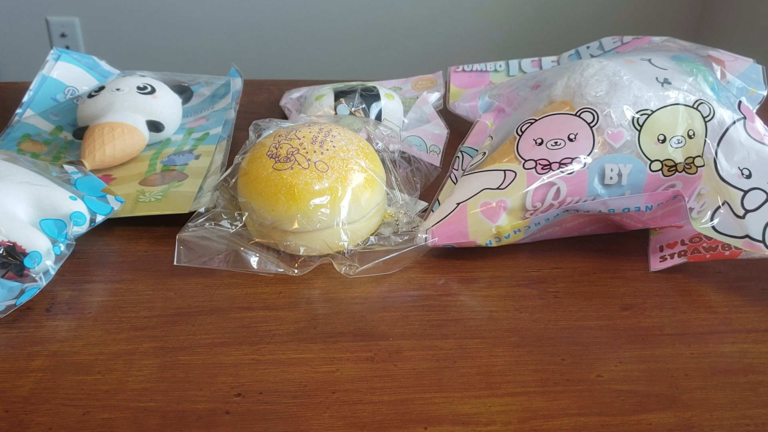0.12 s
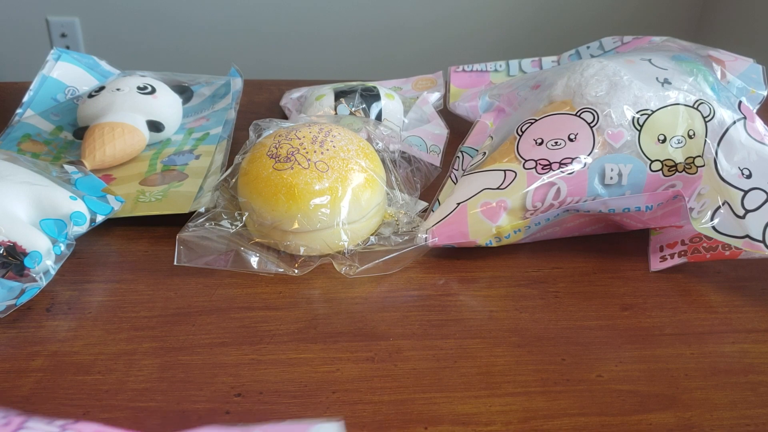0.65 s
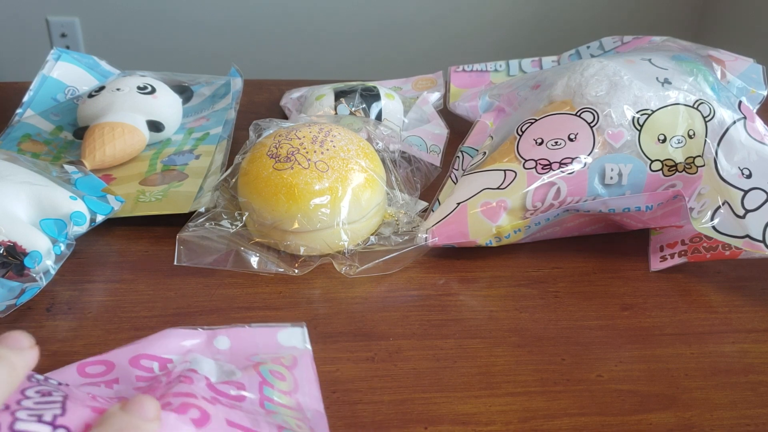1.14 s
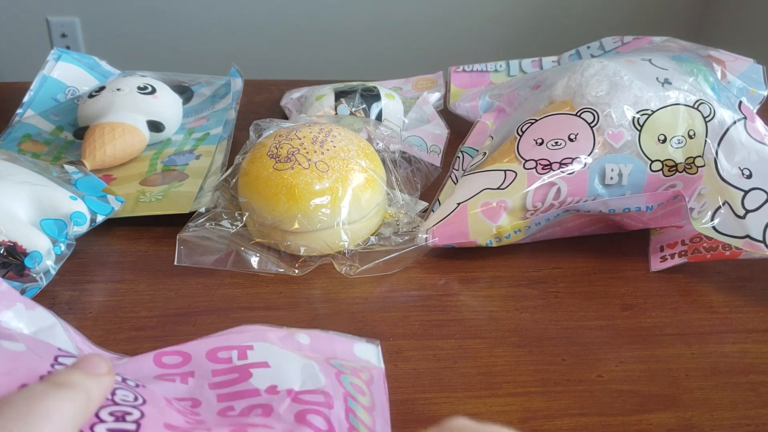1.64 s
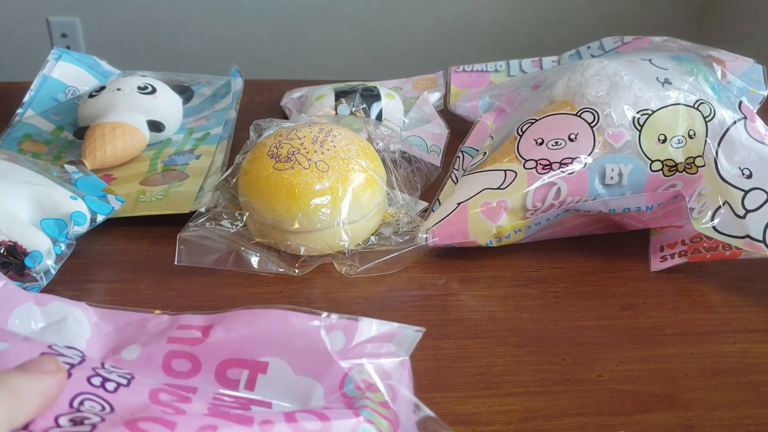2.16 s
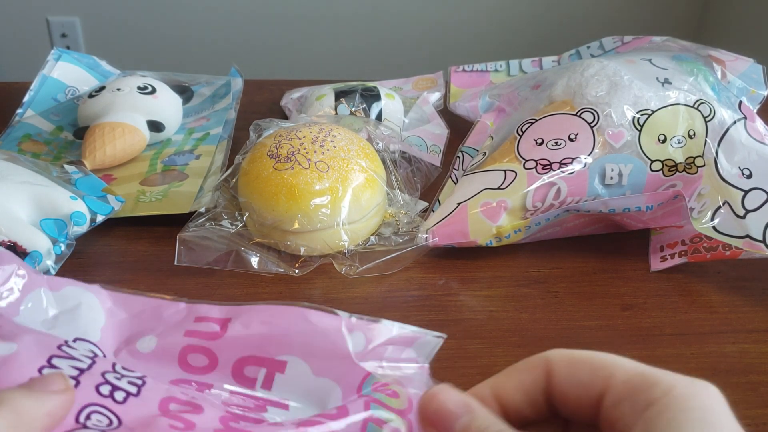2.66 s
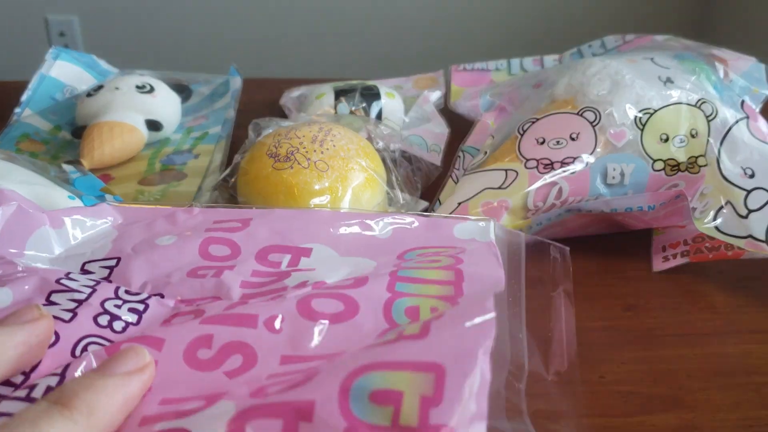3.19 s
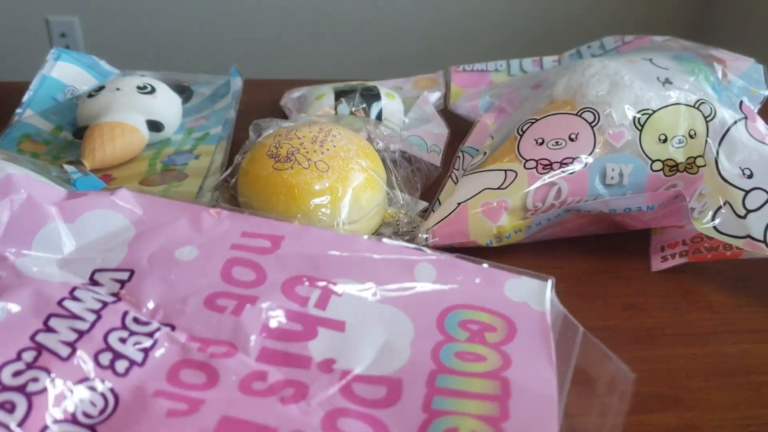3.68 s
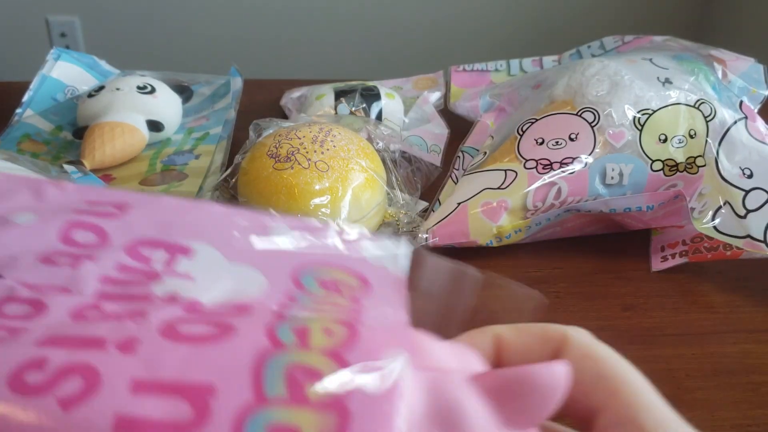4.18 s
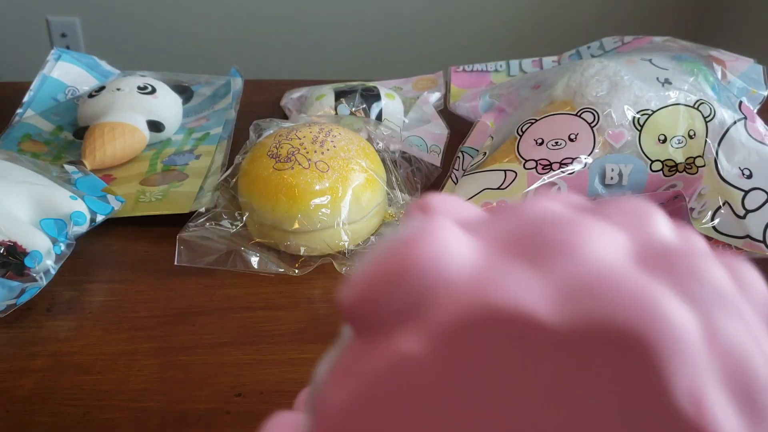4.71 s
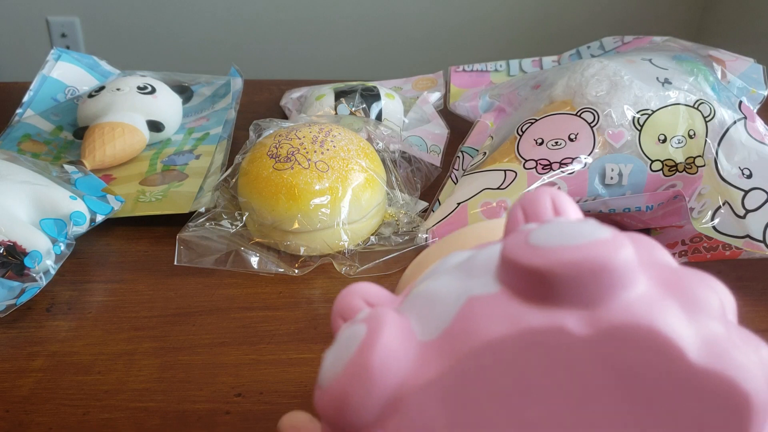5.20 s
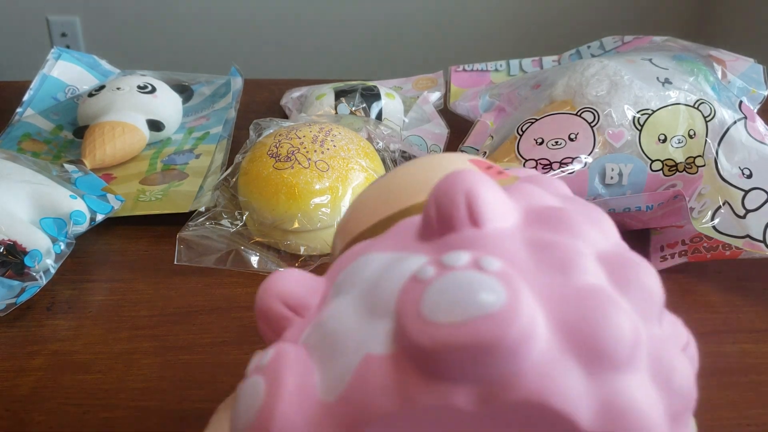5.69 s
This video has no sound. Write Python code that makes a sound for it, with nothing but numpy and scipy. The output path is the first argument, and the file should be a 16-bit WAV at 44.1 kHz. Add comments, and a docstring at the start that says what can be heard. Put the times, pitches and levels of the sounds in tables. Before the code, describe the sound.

Hands handle a stiff plastic packaging bag at a wooden table in a small quiet room. Bright sharp snaps burst in irregular clusters over finer crackle, with small hollow pops of the film. Later the rustle grows softer and fuller as the bag flexes and is emptied, then it thins out to faint room air. Close stereo phone, bag mostly to the left, short room reflections.

```python
"""At a wooden table in a small quiet room, close to a stereo phone and mostly left of it,
two hands turn, pull and open a stiff plastic bag.
Creases snap in short bright bursts of filtered noise, a swarm of smaller ones fills the gaps,
panels pop as brief damped tones and the bag body flexes as low noise.
Table and walls return smeared echoes and a short tail over a steady floor of room air."""
import sys
import numpy as np
from scipy import signal
from scipy.fft import rfft, irfft, next_fast_len
from scipy.io import wavfile
from scipy.ndimage import uniform_filter1d

SR = 44100
rng = np.random.default_rng(int(sys.argv[2]) if len(sys.argv) > 2 else 0)


def boost(x):
    """Linear amplitude factor 10**(x/20) for a level x in decibels (scalar or array-like)."""
    u = np.asarray(x, float) / 20
    return 10 ** u


def unload_audio(sound):
    """Save the sound as a 16-bit wav file, at the path given as the first command line argument."""
    columns = np.transpose(np.atleast_2d(sound))
    # keep every value between -1 and 1, then stretch to whole-number steps
    steps = np.round(np.clip(columns, -1, 1) * 32767)
    wavfile.write(sys.argv[1], SR, steps.astype(np.int16))


N = 257391  # length [samples]
BURST = 1024  # length of one crease [samples]

# Levels in the tables hold ahead of the phone's rounding of peaks.
# Loud crease snaps: (time [s], level [dB], ring [Hz], treble re level, before a common lift [dB])
LOUD_SNAPS = [(0.0273, -31, 4200, -31), (0.0538, -22.5, 5890, -12), (0.0875, -25.5, 7250, -12),
              (0.1266, -29, 4330, -4.5), (0.1422, -21.5, 2200, -23), (0.1718, -24.5, 2680, -16),
              (0.2227, -35, 1670, -20), (0.2395, -27, 3680, -22), (0.2564, -27, 1820, -28),
              (0.3223, -23, 4700, -8), (0.336, -19.5, 4600, -23.5), (0.3681, -29, 4530, -24),
              (0.4152, -32.5, 3130, -18), (0.4525, -13.5, 6550, -8), (0.4558, -25, 4200, -8),
              (0.4943, -19.5, 6400, -3.5), (0.5004, -26.5, 3460, -1.5), (0.5078, -18.5, 4820, -2.5),
              (0.5157, -12.5, 5070, -6.5), (0.5213, -14.5, 5900, -8.5), (0.529, -12, 5710, -11),
              (0.5356, -9.5, 6300, -9), (0.5543, -15, 4910, -1.5), (0.594, -24.5, 6480, -15),
              (0.627, -30.5, 5500, -4), (0.635, -18.5, 3300, -12), (0.6719, -37, 4370, -10),
              (0.684, -30, 7420, -6.5), (0.7111, -32, 3750, -11), (0.7286, -28.5, 7420, -10),
              (0.7864, -20, 1800, -8.5), (0.8263, -29.5, 5420, -13), (0.834, -21, 6200, -12),
              (0.8766, -26, 5060, -16), (0.8995, -29.5, 6600, -11), (0.9052, -28.5, 1500, -18),
              (0.9332, -29.5, 5070, -21), (0.949, -28, 6100, -11), (1.002, -33.5, 4370, -28),
              (1.023, -28, 6640, -14), (1.037, -21, 6740, -7.5), (1.0874, -36.5, 4900, -12),
              (1.1457, -26.5, 4350, -12), (1.1528, -22.5, 4240, -4.5), (1.1628, -31, 4730, -32),
              (1.2097, -24, 6170, -16), (1.2224, -19, 4200, -2), (1.2302, -18.5, 6430, -11),
              (1.2454, -19, 6500, -7), (1.26, -22, 3970, -1), (1.2744, -8, 6600, -11),
              (1.281, -14.5, 5850, -4), (1.2884, -25, 2090, -17.5), (1.2972, -11, 6000, -20.5),
              (1.3042, -15, 6230, -6), (1.3114, -15, 4850, -7), (1.4014, -23.5, 2680, -7),
              (1.4154, -27.5, 2640, -16), (1.4494, -25.5, 6760, -15), (1.4664, -24, 1940, -8.5),
              (1.4854, -22, 6960, -8.5), (1.517, -25.5, 2640, -19), (1.5744, -28.5, 2870, -19),
              (1.6008, -29.5, 2700, -14.5), (1.61, -24.5, 4550, -14.5), (1.6432, -23.5, 4800, -9.5),
              (1.6801, -33, 6600, -14.5), (1.6854, -27.5, 4100, -14), (1.732, -26.5, 6500, -6),
              (1.7362, -28.5, 2750, -7.5), (1.7806, -33, 1530, -11), (1.8017, -21, 6460, -9),
              (1.8136, -34, 5950, -4), (1.8976, -20, 6050, -8.5), (1.9016, -21, 4100, -3.5),
              (1.9677, -21, 5850, 1), (1.9956, -21, 7090, 6), (1.9946, -20.5, 3740, -5.5),
              (2.0003, -21, 1500, -1), (2.0044, -14, 4800, 1), (2.0082, -11, 6600, -4),
              (2.0182, -16, 5900, -5), (2.0234, -19.5, 5330, -19), (2.0393, -15.5, 5370, -12.5),
              (2.0654, -10, 1800, -10), (2.0722, -17, 4020, -9), (2.0764, -17, 6170, -2),
              (2.0827, -17, 3650, -17), (2.1124, -24.5, 2040, -5.5), (2.133, -25, 4130, -16),
              (2.1582, -28, 6620, -6), (2.2054, -26.5, 7050, -6), (2.246, -22, 2450, -24.5),
              (2.2631, -21.5, 2700, -25), (2.2742, -27, 4350, -30), (2.3847, -32, 4840, -27),
              (2.396, -34.5, 1630, -30), (2.4318, -21, 7150, -11), (2.4621, -21, 3380, -5.5),
              (2.497, -25, 1700, -26), (2.6383, -26, 6850, -20), (2.6796, -27.5, 5060, -25.5),
              (2.711, -19, 5870, -4.5), (2.7132, -11.5, 7300, -3.5), (2.7236, -18, 3200, -19),
              (2.7718, -16.5, 4200, -9.5), (2.7997, -17, 5860, -12), (2.8062, -19, 3960, -6.5),
              (2.8185, -13.5, 5540, -5), (2.8314, -17, 4900, -13), (2.8416, -22.5, 3460, -9.5),
              (2.8464, -21, 6160, -6), (2.889, -31.5, 4240, -8), (2.9547, -18.5, 1620, -21),
              (2.9616, -25.5, 6340, -16), (2.9714, -23.5, 5260, -7), (3.0025, -26.5, 4740, -12),
              (3.056, -33.5, 7540, -0.5), (3.0919, -26, 2900, -34), (3.1185, -30.5, 3490, -8),
              (3.13, -25, 3560, -20), (3.1394, -21, 3760, -20), (3.1866, -22, 4250, -9.5),
              (3.2063, -20.5, 3230, -17.5), (3.2656, -27.5, 4280, -24), (3.2944, -23, 3480, -21),
              (3.3087, -25.5, 4800, -6), (3.3393, -30, 4110, -9), (3.3897, -38, 3450, -19),
              (3.459, -24.5, 6260, -17), (3.493, -15, 6400, -10.5), (3.518, -18.5, 2140, -13),
              (3.5371, -19.5, 1970, -7), (3.5592, -19, 4510, -19.5), (3.5738, -14.5, 3900, -13.5),
              (3.5806, -18, 4800, -17), (3.6136, -30.5, 7160, -22), (3.695, -15.5, 3970, -20.5),
              (3.8011, -32.5, 4570, -21), (3.8656, -31.5, 3000, -25), (3.891, -30, 2090, -20),
              (3.9057, -19.5, 4360, -9.5), (3.9366, -25.5, 2800, -22), (3.9509, -27.5, 3490, -26),
              (3.9943, -30.5, 2680, -26), (4.0127, -24, 6460, -18), (4.017, -19.5, 4050, -18),
              (4.0377, -21.5, 4110, -13), (4.0525, -11, 6650, -15.5), (4.0572, -18, 3020, -17),
              (4.0649, -16.5, 4230, -20.5), (4.1088, -13, 5850, -16), (4.1294, -12.5, 4650, -12),
              (4.1407, -15.5, 3500, -17.5), (4.1475, -22, 3490, -21), (4.1737, -28, 1920, -22),
              (4.2074, -28, 1800, -19), (4.2187, -18.5, 6370, -27), (4.2347, -26, 3140, -4.5),
              (4.2654, -22, 3340, -19), (4.2938, -16, 4800, -15), (4.338, -23.5, 4130, -15),
              (4.3445, -21.5, 4240, -19), (4.3636, -21, 4930, -18), (4.3975, -29, 3470, -5),
              (4.4106, -18.5, 4400, -11.5), (4.4244, -25.5, 2820, -15), (4.4603, -32.5, 7100, -24),
              (4.4648, -22, 2970, -30), (4.4957, -29, 2770, -17), (4.5134, -30, 7180, -3),
              (4.602, -32.5, 3250, -30), (4.6478, -27, 4350, -8.5), (4.6635, -28.5, 2400, -20),
              (4.688, -34, 2300, -26), (4.825, -30, 4700, -16), (4.8349, -24.5, 6900, -10.5),
              (4.8648, -35, 4060, -22), (4.9266, -24.5, 3900, -21), (4.9306, -25, 6200, -7.5),
              (5.0569, -25, 7500, -19), (5.0863, -32, 3480, -15), (5.1943, -41, 3760, -20),
              (5.5717, -44.5, 3740, -28)]
# Lag of the left ear behind the right, negative when it leads: (time [s], lag [samples])
LEFT_EAR_LAG = [(0, -4.5), (1.5, -7), (3.0, -2.5), (3.7, -12), (4.7, -19.5), (5.8, -18.5)]
# Tone of the creases at the microphones: (frequency [Hz], relative level [dB])
MIC_RESPONSE = [(40, -38.5), (140, 15), (420, -7.5), (1000, 2), (3000, -1.5), (6500, -2.5), (7300, -1),
                (8800, -14.5), (11900, -15), (15800, -17.5), (16800, -60.5)]
# Colour of the flexing bag body: (frequency [Hz], relative density [dB per Hz])
FLEX_COLOUR = [(30, -16), (60, -1), (135, 2), (330, -2.5), (730, -1), (1500, -22.5)]
# Colour of the room air: (frequency [Hz], relative density [dB per Hz])
FLOOR_COLOUR = [(24, -35.5), (40, -10.5), (113, -4.5), (190, -9), (500, -21.5), (1500, -25), (2000, -12),
                (2700, -10.5), (7000, -18), (8800, -27), (15400, -23.5), (17000, -45.5)]
# Echoes from table and walls: (delay [s], level re the bag [dB])
SURFACE_ECHOES = [(.0025, -8.5), (.009, -16), (0.015, -19.5)]
# Decay of the small room: (frequency [Hz], time to fall 60 dB [s])
ROOM_DECAY = [(200, 0.13), (1400, 0.12), (4000, 0.18), (12000, 0.12)]
# Hollow pops and thuds of whole panels: (time of peak [s], peak rms before panning [dB], pitch [Hz])
PANEL_POPS = [(0.056, -36.5, 850), (0.324, -30, 1080), (0.456, -36, 1040), (0.497, -44.5, 148),
              (0.524, -32.5, 1090), (0.537, -45, 155), (0.537, -41, 790), (1.262, -55, 117),
              (1.299, -48, 880), (1.899, -38.5, 930), (1.999, -31, 1330), (2.042, -41.5, 804),
              (2.067, -35.5, 1067), (2.072, -41, 302), (2.077, -29, 950), (2.247, -39, 1160),
              (2.774, -27.5, 710), (2.802, -37, 600), (2.821, -47.5, 980), (2.824, -52, 131),
              (2.955, -49, 1300), (3.142, -41.5, 690), (3.699, -37, 875), (4.015, -42.5, 236),
              (4.15, -34, 784), (4.267, -39, 720), (4.829, -49.5, 130), (4.934, -41.5, 170),
              (1.525, -55, 101), (1.996, -52, 130), (2.022, -52, 110), (4.14, -49, 120), (4.248, -47, 170),
              (4.561, -45, 373)]
# Grips and pulls: (start [s], end [s], base level of small crackle [dB], level of flexing [dB])
HAND_GRIPS = [(0, 0.026, -41.5, -70), (0.123, .41, -47.5, -69.5), (0.498, 0.57, -35.5, -50),
              (0.72, 1.12, -51, -68), (1.193, 1.238, -43, -71.5), (1.248, 1.301, -25.5, -62),
              (1.4, 1.747, -45, -68.5), (1.908, 1.881, -36, -53), (2.02, 2.063, -27, -58),
              (2.197, 2.304, -53, -71.5), (2.424, 2.467, -54.5, -73.5), (2.686, 2.773, -40, -60.5),
              (2.782, 2.809, -27.5, -49), (2.936, 3.002, -41, -56.5), (3.203, 3.217, -41, -52.5),
              (3.322, 3.592, -41, -52), (3.69, 3.735, -46, -53), (3.886, 3.99, -42, -52),
              (4.064, 4.256, -38, -49.5), (4.318, 4.432, -43, -46.5), (4.424, 4.566, -48.5, -50.5),
              (4.63, 4.738, -51.5, -61.5), (4.82, 4.847, -41.5, -52.5), (4.93, 4.953, -47.5, -49),
              (4.996, 5.105, -49, -59.5), (5.152, 5.312, -62.5, -83), (5.685, 5.733, -69.5, -72.5)]
# Place and facing of the bag: (time [s], left minus right [dB], small-crease treble before lift [dB])
BAG_PLACE = [(0, 4.5, -13.5), (.5, 7.5, -25), (1.3, 5, -12.5), (2.0, 4, -15.5), (2.6, 4.5, -27),
             (3.4, 5, -18.5), (3.8, 4, -17.5), (4.4, 10.5, -23), (5.2, 9.5, -20), (5.84, -1, -5)]

FLOOR_DB, ROOM_TAIL_DB = -68, -7.5  # middle of the two ears; tail energy re the bag
RISE_DB_PER_S, FALL_DB_PER_S = 402, 186.5  # slopes before and after a grip
SNAP_BODY_DB, BODY_SCATTER_DB, PAN_SCATTER_DB = -15.5, 3.5, 3  # body before a common trim
LEFT_RIGHT = np.array([[1], [-1]])


def shape(points, hz):
    """Value of a (frequency [Hz], value) table on a log-frequency axis."""
    f, v = np.transpose(points)
    return np.interp(np.log(np.maximum(hz, 1)), np.log(f), v)


def colour(x, points):
    """Filter by a (frequency [Hz], level [dB]) table."""
    n = next_fast_len(x.shape[-1])
    gain = boost(shape(points, np.fft.rfftfreq(n, 1 / SR)))
    return irfft(rfft(x, n) * gain, n)[..., :x.shape[-1]]


def unit(x):
    """Scale to rms 1."""
    return x / np.sqrt(np.mean(x ** 2))


def walk(rate):
    """Random levels held 1 / rate s and slewed; spread near 1."""
    hold = int(SR / rate)
    steps = np.repeat(rng.standard_normal(N // hold + 1), hold)
    return unit(uniform_filter1d(steps, hold)[:N])


def resonance(hz, centre_hz, q):
    """Response of a damped patch of film."""
    damping = 1j * hz * centre_hz / q
    return damping / (centre_hz ** 2 - hz ** 2 + damping)


def floor():
    """Quiet room air as steady coloured noise; its bass is more alike in both ears."""
    mid, side = colour(rng.standard_normal((2, N)), FLOOR_COLOUR)
    side = colour(side, [(200, -7.5), (1400, 0.5)])
    ears = (mid + side * LEFT_RIGHT) / np.std(mid)
    return boost(FLOOR_DB + 2.0 * LEFT_RIGHT) * ears


def grips():
    """Crackle and flexing levels build up fast to each grip and die away more slowly after it."""
    t = np.arange(N) / SR
    power = 0
    for start, end, *db in HAND_GRIPS:
        # where the end precedes the start the two slopes overlap
        fade_db = RISE_DB_PER_S * np.maximum(start - t, 0) + FALL_DB_PER_S * np.maximum(t - end, 0)
        power = power + boost(np.array(db)[:, None] - fade_db) ** 2
    return 10 * np.log10(power)


def snaps(s, level_db, ring_hz, body_db, treble_db, pan_db, rise_ms, q, alike):
    """Each crease buckles in a run of tiny slips about a millisecond long that rings the film around it."""
    t = np.arange(BURST) / SR
    hz = np.fft.rfftfreq(BURST, 1 / SR)
    draw = rng.standard_normal((len(s), 2 * BURST + 2))
    left_slips, right_slips = draw[:, :BURST], draw[:, BURST:2 * BURST]
    rise = rise_ms / 1000 * np.exp(0.14 * draw[:, -1:])
    swell = t / rise * np.exp(-t / rise)
    # the air in the bag hums near one pitch, the slack film varies from crease to crease
    film_hz = 800 * np.exp(0.45 * draw[:, -2:-1])
    body = resonance(hz, 730, 2.0) + 1.36 * resonance(hz, film_hz, 1.66) ** 2
    ring = resonance(hz, ring_hz[:, None], q) + 0.77 * resonance(hz, 6800, 0.39)
    treble = resonance(hz, 12550, 1.57) ** 2
    # the far ear sees the patch from another side: treble detail differs and arrives apart
    share = np.clip(alike, 0, 1) ** (hz ** 2 / (hz ** 2 + 900 ** 2))
    lag = np.interp(s, *np.transpose(LEFT_EAR_LAG))[:, None]
    shift = np.exp(2j * np.pi * hz * lag / SR)
    mic = boost(shape(MIC_RESPONSE, hz))

    def levelled(spectrum, db):
        """Set the energy as if it were spread over half a millisecond."""
        energy = np.sum(irfft(spectrum) ** 2, 1, keepdims=True)
        return boost(db)[:, None] * spectrum * np.sqrt(.0005 * SR / energy)

    # (response, level [dB], sharpness): treble comes only from the fastest part of the run
    parts = ((ring, 0 * s, 1.3), (body, body_db - .7, .7), (treble, treble_db + 4.5, 2.6))
    left = right = 0
    for response, part_db, sharpness in parts:
        near = rfft(left_slips * swell ** sharpness) * response * mic
        other = rfft(right_slips * swell ** sharpness) * response * mic
        far = (share * near + np.sqrt(1 - share ** 2) * other) * shift
        left = left + levelled(near, part_db)
        right = right + levelled(far, part_db)
    out = np.zeros((2, N + BURST))
    at = (s * SR).astype(int)[:, None] + np.arange(BURST)
    for side, sign, burst in zip(out, (1, -1), (left, right)):
        np.add.at(side, at, boost(level_db + sign * pan_db / 2)[:, None] * irfft(burst))
    return out[:, :N]


def crackle(level_db, treble_db, pan_db, count, spread_db):
    """Small creases let go at random moments: many faint, a few strong."""
    draw = rng.random((count, 6))
    # a wavy warp of time bunches the moments into clusters
    last = (N - 1) / SR
    s = draw[:, 0] * last
    s = np.clip(s + .004 * walk(60)[(s * SR).astype(int)], 0, last)
    at = (s * SR).astype(int)
    size_db = -2.5 - spread_db * np.log(1 - .97 * draw[:, 1])
    ring_hz = 1800 * 2.77 ** draw[:, 2]
    body_db = -20 + 14 * draw[:, 3]
    crease_treble_db = treble_db[at] + 10 * (draw[:, 4] - .5)
    crease_pan_db = pan_db[at] + 8 * (draw[:, 5] - .5)
    return snaps(s, level_db[at] + size_db, ring_hz, body_db, crease_treble_db, crease_pan_db,
                 rise_ms=0.912, q=0.65, alike=0.2)


def flexing(level_db, pan_db):
    """The air-filled bag body puffs and thuds softly when squeezed; long waves reach both ears more evenly."""
    puffs = boost(3.8 * walk(40))
    shared, apart = (unit(colour(rng.standard_normal(N) * puffs, FLEX_COLOUR)) for _ in range(2))
    return boost(level_db + 0.19 * pan_db * LEFT_RIGHT) * (shared + .5 * apart * LEFT_RIGHT)


def room(x):
    """Smeared echoes from table and walls, and a diffuse tail whose octaves each decay at their own rate."""
    t = np.arange(int(.5 * SR)) / SR
    tail = 0
    for hz in 125 * 2. ** np.arange(8):
        octave = [(hz / 2, -40), (hz / 1.4, 0), (hz * 1.4, 0), (hz * 2, -40)]
        band = colour(rng.standard_normal((2, len(t))), octave)
        band = band + 900 / hz * band.mean(0)  # the bass is more alike in both ears
        decay = np.exp(-np.log(1000) * t / shape(ROOM_DECAY, hz))
        tail = tail + unit(band) / np.sqrt(np.mean(hz ** -1.)) * decay
    tail = tail * np.clip((t - .004) / 0.0046, 0, 1)
    answer = boost(ROOM_TAIL_DB) * tail / np.sqrt(np.sum(tail ** 2, 1, keepdims=True))
    for s, db in SURFACE_ECHOES:
        smear = rng.standard_normal((2, len(t))) * np.exp(-np.abs(t - s) / 0.00048)
        answer = answer + boost(db) * smear / np.sqrt(np.sum(smear ** 2, 1, keepdims=True))
    return signal.fftconvolve(x.mean(0, keepdims=True), answer, axes=1)[:, :N]


def loud_creases(pan_db):
    """The strong snaps, each from its own spot on the bag."""
    s, level_db, ring_hz, treble_db = np.transpose(LOUD_SNAPS)
    draw = rng.standard_normal((len(s), 2))
    body_db = SNAP_BODY_DB + BODY_SCATTER_DB * draw[:, 0]
    snap_pan_db = pan_db[(s * SR).astype(int)] + PAN_SCATTER_DB * draw[:, 1]
    return snaps(s, level_db, ring_hz, body_db, treble_db, snap_pan_db,
                 rise_ms=0.876, q=3.9, alike=0.097)


def pops(pan_db, cycles):
    """A panel of the bag flips and swings for a few cycles, pushing the air inside."""
    t = np.arange(4 * BURST) / SR
    out = np.zeros((2, N + len(t)))
    for (s, db, hz), turn in zip(PANEL_POPS, rng.random(len(PANEL_POPS))):
        rise = cycles / hz
        envelope = np.sqrt(2) * t / rise * np.exp(1 - t / rise)
        swing = envelope * np.sin(2 * np.pi * (hz * t + turn))
        at = int((s - rise) * SR)
        out[:, at:at + len(t)] += boost(db + 0.35 * pan_db[at] * LEFT_RIGHT) * swing
    return out[:, :N]


def scene():
    """Bag, room and floor as the two microphones hear them."""
    s, *columns = np.transpose(BAG_PLACE)
    pan_db, treble_db = (np.interp(np.arange(N) / SR, s, c) for c in columns)
    quiet_air = floor()
    crackle_db, flex_db = grips()
    small_creases = crackle(crackle_db, treble_db, pan_db, count=1900, spread_db=5.5)
    body = flexing(flex_db, pan_db)
    creases = small_creases + loud_creases(pan_db)
    return quiet_air + creases + room(creases) + body + pops(pan_db, cycles=0.91)


def band_limit(x):
    """A steep low-pass at the top of the band."""
    return signal.sosfilt(signal.butter(12, 17140, fs=SR, output="sos"), x)


def record(dry):
    """The phone rounds the loudest peaks."""
    mix = 0.79 * np.tanh(dry / 0.81)
    return band_limit(mix)


dry = scene()
out = record(dry)
unload_audio(out)
```